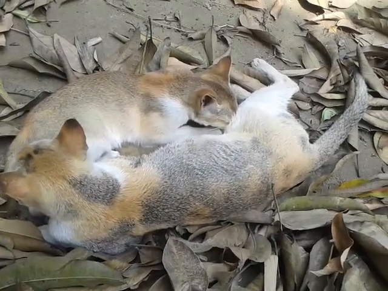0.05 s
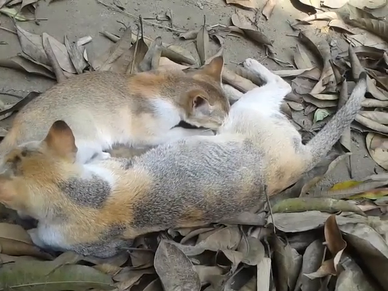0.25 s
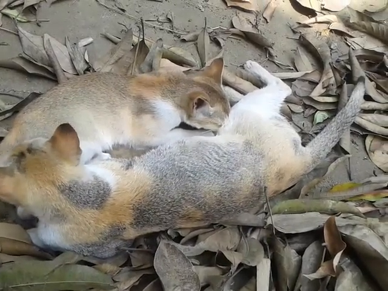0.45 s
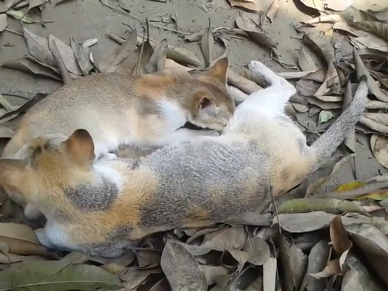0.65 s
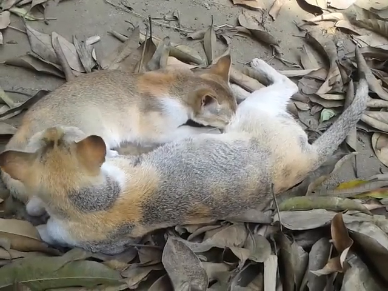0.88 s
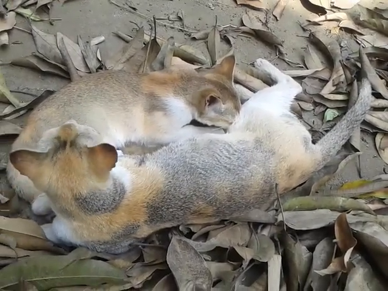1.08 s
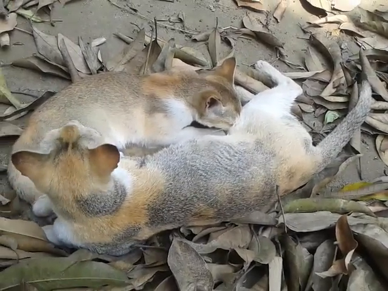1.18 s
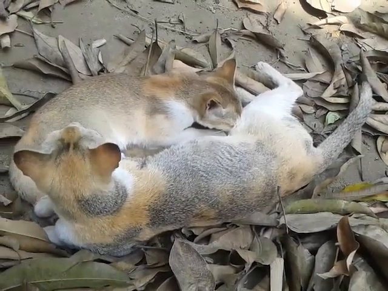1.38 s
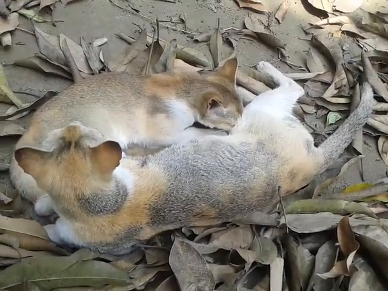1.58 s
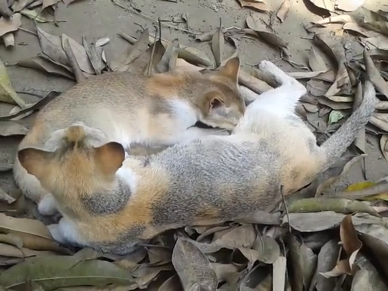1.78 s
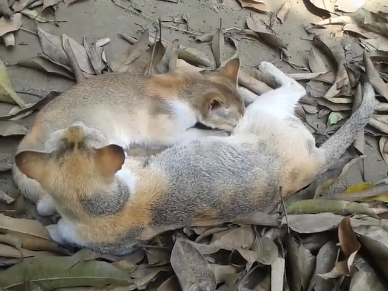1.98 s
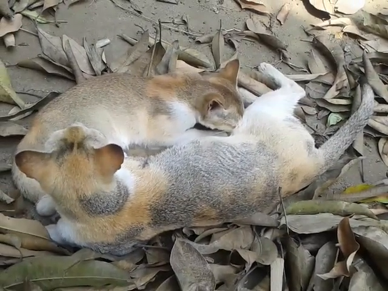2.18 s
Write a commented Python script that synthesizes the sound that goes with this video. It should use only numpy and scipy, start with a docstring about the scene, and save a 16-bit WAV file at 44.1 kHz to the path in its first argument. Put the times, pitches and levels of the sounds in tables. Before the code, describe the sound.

A bird chirps repeatedly outdoors over rustling dry leaves and light wind.

```python
"""Bird chirping in a yard

A bird gives eight arched chirps, about five a second, echoed by walls and trees. Each is a harmonic
tone shaped by throat and beak, ending in a downward flick and a rough snap. Dry leaves swish in swells
of tiny contacts, small birds whistle far off, and a light wind rumbles underneath."""
import sys
import numpy as np
from scipy import signal
from scipy.fft import rfft, irfft
from scipy.io import wavfile
from scipy.ndimage import uniform_filter1d

SR = 44100
rng = np.random.default_rng(int(sys.argv[2]) if len(sys.argv) > 2 else 0)


def inscribe(sig):
    """Save sig as 16-bit PCM at rate SR to the path in sys.argv[1].

    A 1-D sig is mono; a 2-D sig holds one channel per row.
    Samples are clipped to [-1, 1] before scaling.
    """
    pcm = np.round(np.clip(np.atleast_2d(sig).T, -1, 1) * 32767)
    wavfile.write(sys.argv[1], SR, pcm.astype(np.int16))


N = 99225


def chirp(start_s, arch_s, top_hz, top_share, db, second_db, upper_db, snap_db):
    """A swelling pitch arch, filtered by throat and beak, breaks into a falling flick and a snap."""
    # Each row: frequency in Hz, gain of throat and beak in dB.
    throat = [(1200, -22), (1600, -18), (2000, -5.5), (2400, 0.5), (2900, 1.5), (3500, -7), (3950, -2.5),
              (4300, -2), (5100, -8.5), (5600, -8.5), (6300, -11), (7200, -21.5), (7800, -26), (8500, -36),
              (10300, -32), (14000, -39)]
    # Each row: frequency in Hz, relative noise density in dB.
    snap_spectrum = [(900, -49), (1500, -5.5), (2100, -8), (2700, 6), (3400, -5), (4300, 0.5),
                     (5500, -16.5), (7000, -7), (8500, -27), (15000, -27)]
    attack_s, onset_db, shimmer_db = .033, -9.5, 2.74
    flick_s, flick_end_hz = .018, 1281.4
    jitter, rasp, hoarse_rad = .0062, .084, .38
    snap_delay_s, snap_width_s = .0098, .0105
    t = np.arange(N) / SR - start_s
    u = np.clip(t / arch_s, 0, 1)
    rising = np.clip(1 - u / top_share, 0, 1)
    falling = np.clip((u - top_share) / (1 - top_share), 0, 1)
    span_hz = top_hz - min(2000, .94 * top_hz)
    arch_hz = top_hz - span_hz * (rising ** 2.6 + .7 * falling ** 2.5)
    flick = np.clip((t - arch_s) / flick_s, 0, 1)
    waver = 1 + jitter * walk(258) + rasp * flick * walk(1400)
    hz = arch_hz * (flick_end_hz / arch_hz) ** flick * waver
    gate = np.clip(t / .0053, 0, 1) * np.clip((arch_s + flick_s - t) / .0033 + 1, 0, 1)
    swell_db = onset_db * (1 - np.clip(t / attack_s, 0, 1))
    effort = gate * undb(db + swell_db + shimmer_db * walk(174))
    on = gate > 0
    phase = 2 * np.pi * np.cumsum(hz[on]) / SR
    voice = np.zeros(N)
    voice[on] = np.sin(phase) * response(throat, hz[on])
    for k in range(2, 6):
        # Overtones shimmer, and fade in the flick.
        gain = undb((second_db if k == 2 else upper_db) + 3 * walk(270) - 6 * np.sqrt(flick))
        overtone = np.sin(k * phase + hoarse_rad * walk(900)[on])
        voice[on] += overtone * response(throat, k * hz[on]) * gain[on]
    burst = undb(db + snap_db - 3.5) * np.exp(-((t - arch_s - snap_delay_s) / snap_width_s) ** 2)
    return voice * effort + burst * colour(grains(depth_db=4, rate_hz=2200), snap_spectrum)


def near_bird():
    """Chirps heard directly, scattered by ground and foliage, and echoed by the yard."""
    # Each row: start in seconds, arch length in seconds, top pitch in Hz, place of the top from 0 to 1,
    # base level in dB, then offsets in dB for second harmonic, higher harmonics, snap and echo.
    chirps = [(0.211, 0.095, 2755, .42, -41.5, -1.5, -13, -5, -4),
              (0.437, 0.076, 1945, 0.36, -51, 0, -1, 4.5, 3.5),
              (0.611, 0.091, 2456, .54, -40.5, -.5, -3, -11, 0),
              (0.823, 0.089, 2357, 0.46, -38.5, .5, 1, -9, -1.5),
              (1.042, 0.097, 2180, 0.49, -37.5, -3, -2, -3, -1),
              (1.253, 0.104, 2545, .56, -39, -1, -1.5, -3.5, .5),
              (1.459, 0.107, 2495, .52, -37.5, -3.5, -4.5, -8.5, 1),
              (1.685, 0.086, 1990, .35, -42, -1.5, -5, -2, 3)]
    # Each row: delay from a nearby surface in seconds, gain in dB.
    reflections = [(.016, -18), (.031, -13), (.052, -13), (.078, -18.5)]
    t = np.arange(N) / SR
    calls = [chirp(*row[:-1]) for row in chirps]
    direct = sum(calls)
    sent = sum(call * undb(row[-1]) for call, row in zip(calls, chirps))
    echoes = sum(undb(db) * np.interp(t - delay_s, t, sent, left=0) for delay_s, db in reflections)
    bright = equalise(direct, [(2800, 0), (4500, 7.5)])  # foliage scatters overtones more
    ground = undb(-10.5) * scatter(bright, t60_s=.14, build_s=.0037)
    yard = undb(-7) * scatter(sent, t60_s=.69, build_s=.013)
    return undb(-1.5) * direct + ground + echoes + yard


def leaves():
    """Dense tiny contacts of dry leaves: swishes with a finer hiss on top."""
    # Each row: peak time in seconds, level in dB, rise in seconds, fade in dB per second.
    swishes = [(0.36, -62, 0.07, -4), (0.72, -48.5, 0.11, 18), (0.84, -49, .12, 40),
               (1.637, -40.5, 0.076, 48), (1.72, -48, 0.11, 79), (1.959, -50, 0.049, 63)]
    # Each row of both: frequency in Hz, relative noise density in dB.
    body_spectrum = [(150, -20), (500, -18), (1000, -15), (1800, -11), (2400, -2), (3300, -1.5), (4300, -5),
                     (5500, -10.5), (7500, -16.5), (15000, -36)]
    hiss_spectrum = [(1500, -21), (3500, 0), (5500, 0.5), (8000, -4.5), (10500, -4.5), (13000, -11),
                     (15500, -10)]
    # Each row: time in seconds, level in dB.
    hiss_levels = [(0, -79.5), (0.2, -78.5), (0.34, -69.5), (0.59, -71), (0.69, -55.5), (0.84, -49.5),
                   (1.0, -57), (1.2, -62), (1.48, -68), (1.57, -54.5), (1.68, -45), (1.86, -55),
                   (1.98, -56.5), (2.12, -67.5), (2.25, -76.5)]
    t = np.arange(N) / SR
    power = 0
    for peak_s, db, rise_s, fade_db_per_s in swishes:
        rise_db = -20 * np.clip((peak_s - t) / rise_s, 0, 10) ** 2
        power += undb(db + rise_db - fade_db_per_s * np.maximum(t - peak_s, 0)) ** 2
    settle = curve([(1.95, -1.5), (2.25, -21)])
    body = colour(grains(depth_db=1, rate_hz=1200), body_spectrum)
    hiss = colour(grains(depth_db=.5, rate_hz=1200), hiss_spectrum)
    return np.sqrt(power) * settle * body + curve(hiss_levels) * hiss


def far_birds():
    """Thin wavering whistles with a strong diffuse echo."""
    # Each row: start in seconds, length in seconds, first and last pitch in Hz, base level in dB.
    whistles = [(-0.08, 0.15, 3280, 3165, -69), (0.14, 0.11, 3330, 3080, -63),
                (0.34, 0.10, 3256, 3313, -56.5), (0.386, 0.12, 3026, 3020, -56.5),
                (2.021, 0.08, 2560, 2315, -58.5), (2.099, 0.13, 2143, 2400, -67)]
    t = np.arange(N) / SR
    direct = 0
    for start_s, length_s, first_hz, last_hz, db in whistles:
        u = np.clip((t - start_s) / length_s, 0, 1)
        hz = (first_hz + (last_hz - first_hz) * u) * (1 + .0281 * walk(340))
        envelope = undb(db) * np.sqrt(4 * u * (1 - u))
        direct += envelope * np.sin(2 * np.pi * np.cumsum(hz) / SR)
    return undb(1) * direct + undb(2) * scatter(direct, t60_s=.81, build_s=.006)


def wind():
    """Soft gusting rumble over steady outdoor air."""
    # Each row: time in seconds, level in dB.
    gust_levels = [(0, -77.5), (0.2, -76), (0.3, -65), (0.42, -68), (0.55, -67.5), (0.9, -63.5),
                   (1.35, -64), (1.8, -63.5), (2.02, -65.5), (2.25, -73.5)]
    # Each row of both: frequency in Hz, relative noise density in dB.
    wind_spectrum = [(25, -33), (45, -15), (70, 0), (115, 3), (170, -1), (300, -6.5), (600, -8),
                     (1200, -13), (2000, -13), (4000, -29)]
    air_spectrum = [(88, -34), (150, -2), (450, -11), (1050, -14), (1510, -8), (2230, -7), (3270, -2.5),
                    (3970, -22.5), (15000, -23.5)]
    flutter_db, air_db = 1.2, -72.5
    strength = curve(gust_levels) * undb(flutter_db * walk(20))
    rumble = strength * colour(rng.standard_normal(N), wind_spectrum)
    return rumble + undb(air_db) * colour(rng.standard_normal(N), air_spectrum)


def scatter(x, t60_s, build_s):
    """Diffuse echo from trees and walls that builds up and dies away."""
    t = np.arange(N) / SR
    build = (1 - np.exp(-t / build_s)) ** 2
    tail = rng.standard_normal(N) * np.exp(-np.log(1000) * t / t60_s) * build
    return signal.fftconvolve(x, tail / np.linalg.norm(tail))[:N]


def undb(db):
    """Decibels to gain."""
    return 10 ** (np.asarray(db) / 20)


def curve(points):
    """Gain over time from (s, dB) points."""
    return undb(np.interp(np.arange(N) / SR, *np.array(points).T))


def response(points, hz):
    """Gain at given frequencies from (Hz, dB) points."""
    point_hz, db = np.array(points).T
    return undb(np.interp(np.log(np.maximum(hz, 1)), np.log(point_hz), db))


def equalise(x, points):
    """Filter by (Hz, dB) points."""
    return irfft(rfft(x) * response(points, np.arange(N // 2 + 1) * SR / N), N)


def colour(x, points):
    """Equalise and scale to rms 1."""
    y = equalise(x, points)
    return y / y.std()


def walk(rate_hz):
    """Smooth random motion with standard deviation 1."""
    width = max(int(SR / rate_hz), 1)
    y = uniform_filter1d(uniform_filter1d(rng.standard_normal(N), width), width)
    return y / y.std()


def grains(depth_db, rate_hz):
    """Noise with a flickering level."""
    return rng.standard_normal(N) * undb(depth_db * walk(rate_hz))


def scene():
    """All sources at one microphone."""
    return (near_bird() + far_birds() + leaves() + wind())[None]


def record(dry):
    """Steep low-pass on the top treble."""
    cutoff_hz = 15550
    return signal.sosfilt(signal.ellip(10, .2, 70, cutoff_hz, fs=SR, output="sos"), dry)


dry = scene()
out = record(dry)
inscribe(out)
```